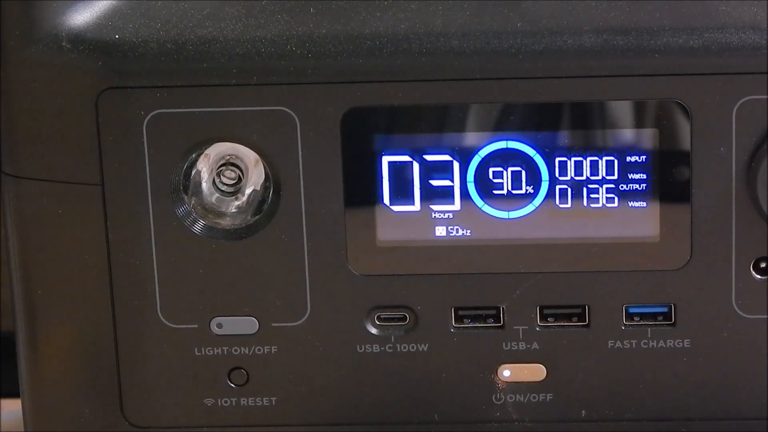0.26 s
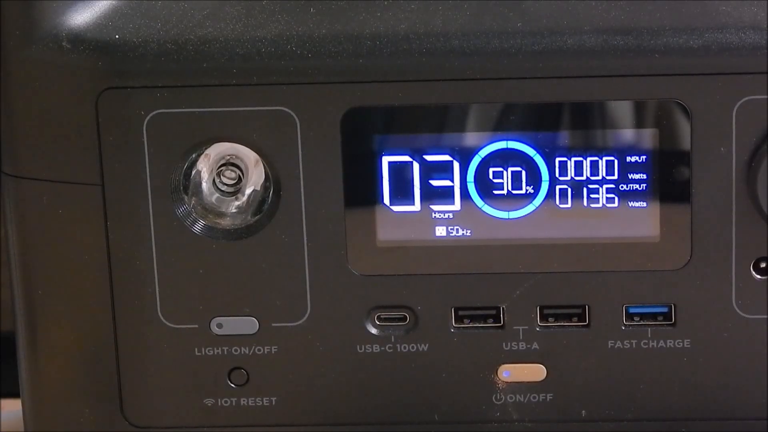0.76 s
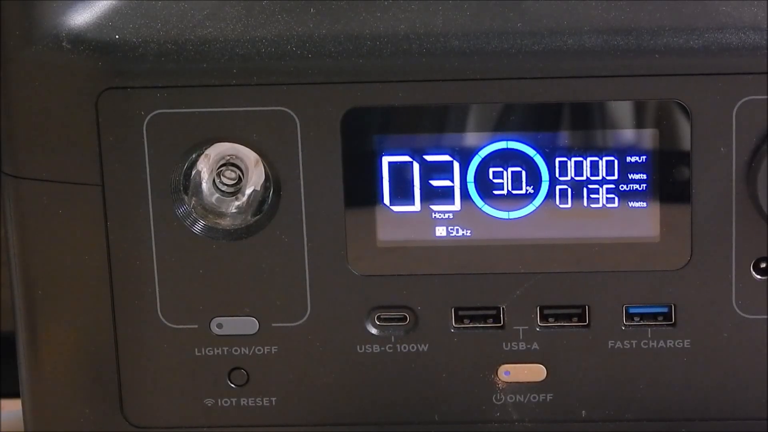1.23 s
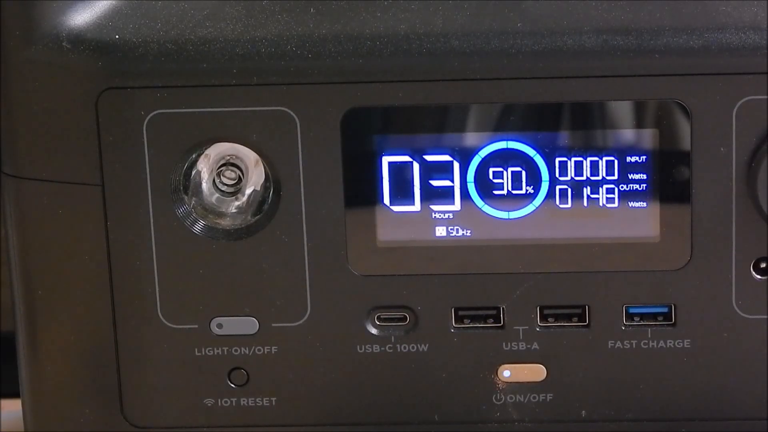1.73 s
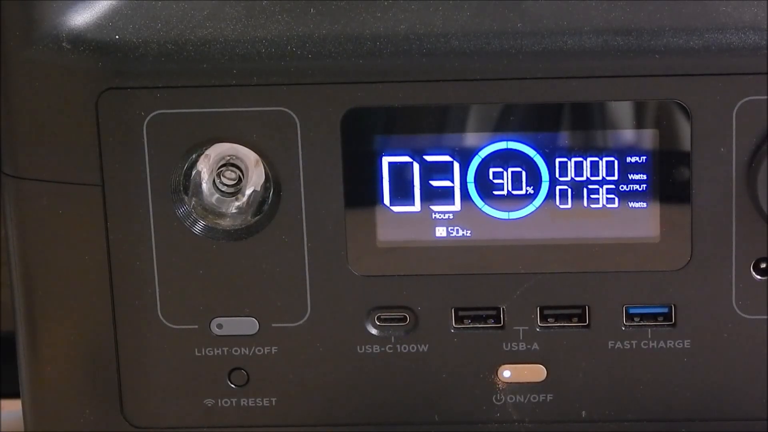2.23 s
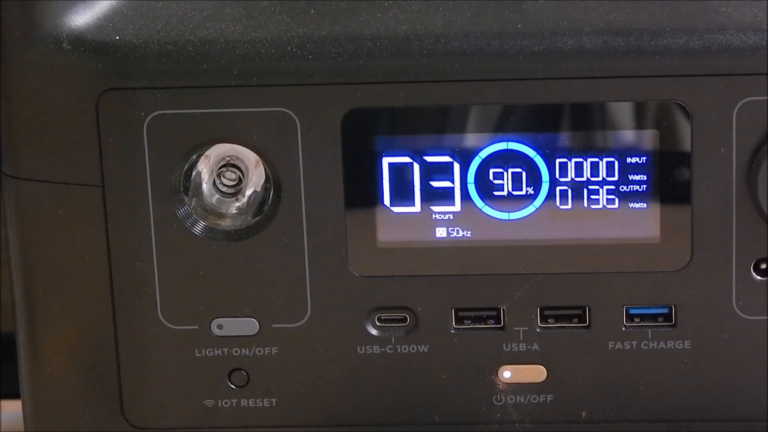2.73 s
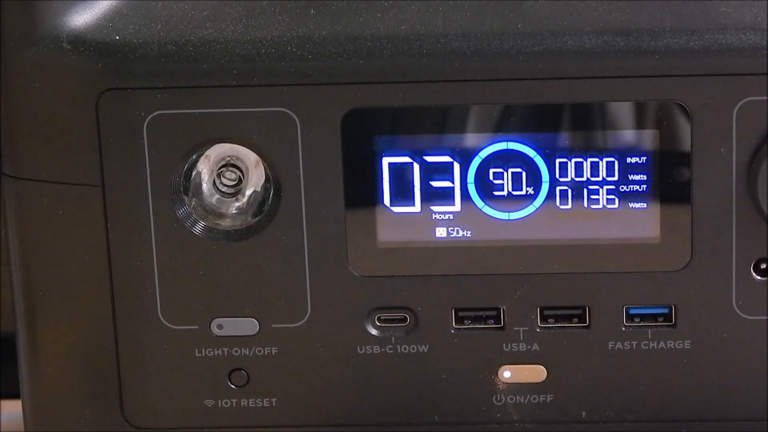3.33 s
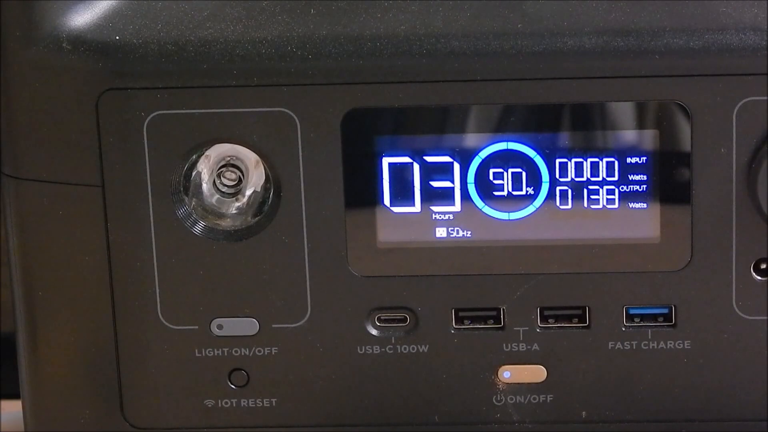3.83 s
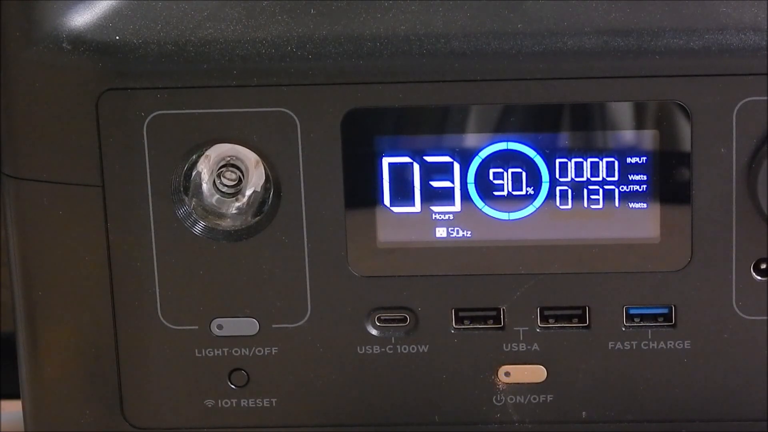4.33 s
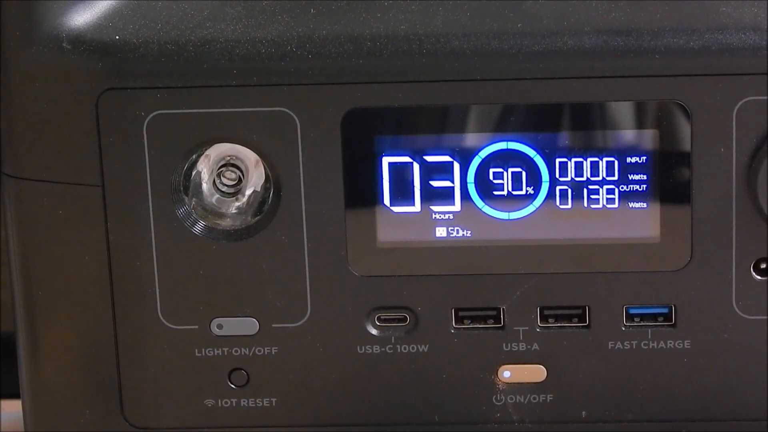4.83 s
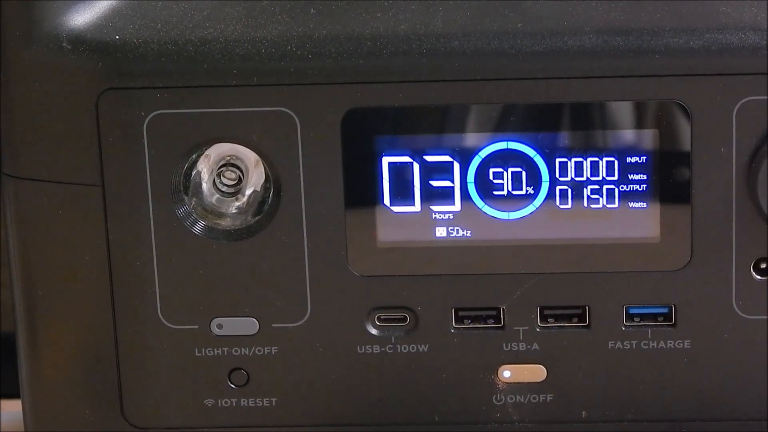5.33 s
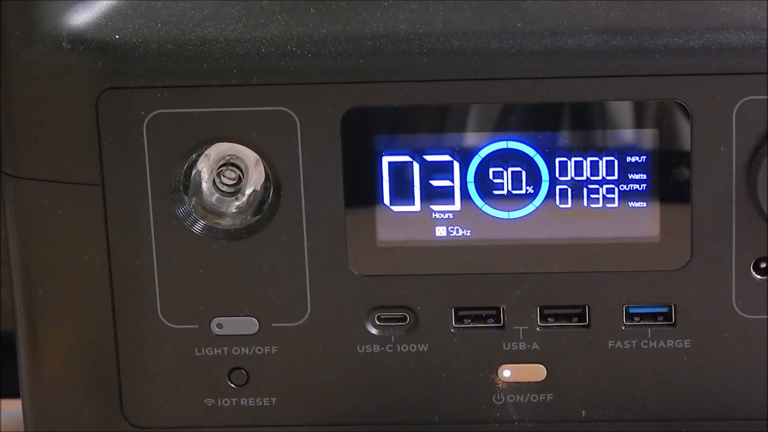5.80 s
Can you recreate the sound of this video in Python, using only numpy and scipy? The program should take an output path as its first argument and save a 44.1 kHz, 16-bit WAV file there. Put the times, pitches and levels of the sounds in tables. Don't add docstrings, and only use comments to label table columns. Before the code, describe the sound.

A fuel pump knocks sharply every 0.7 seconds over a soft blower rush, until a deep, swelling burner hum surges up near the end.

```python
import sys
import numpy as np
from scipy import signal
from scipy.io import wavfile
from scipy.ndimage import uniform_filter1d

SR = 44100
rng = np.random.default_rng(int(sys.argv[2]) if len(sys.argv) > 2 else 0)


def bounce(signal):
    frames = np.transpose(np.atleast_2d(signal))
    limited = np.clip(frames, -1, 1)
    pcm = np.round(limited * 32767).astype(np.int16)
    wavfile.write(sys.argv[1], SR, pcm)


def convert_level_to_amplitude(level_db):
    exponent = np.asarray(level_db, float) / 20
    return 10 ** exponent


N = 267378


def rms_one(x):
    return x / np.sqrt(np.mean(x ** 2) + 1e-20)


def at_hz(points, hz, column=1):
    points = np.array(points)
    return np.interp(np.log(hz), np.log(points[:, 0]), points[:, column])


def drift(rate_hz):
    r = np.exp(-80 * np.pi * rate_hz / SR)
    white = rng.standard_normal(N // 40 + 2002)
    slow = signal.lfilter([1], [1, -2 * r, r * r], white)[2000:]
    return np.interp(np.arange(N) / 40, np.arange(len(slow)), rms_one(slow))


def clicks(times, levels_db, size=N):
    out = np.zeros(size)
    np.add.at(out, (np.asarray(times) * SR).astype(int), convert_level_to_amplitude(np.asarray(levels_db)))
    return out


def ring(x, hz, t60):
    r = convert_level_to_amplitude(-60 / (t60 * SR))
    w = 2 * np.pi * hz / SR
    return signal.lfilter([0, np.sin(w)], [1, -2 * r * np.cos(w), r * r], x + 1e-18)


def resonance(hz, width_hz):
    x = rng.standard_normal(N)
    r = np.exp(-np.pi * width_hz / SR)
    w = 2 * np.pi * hz / SR
    for _ in range(2):
        x = signal.lfilter([1, 0, -1], [1, -2 * r * np.cos(w), r * r], x)
    return rms_one(x)


# f/Hz, left-right likeness (-1 to 1)
COHERENCE = [(100, 0.9316), (250, 0.97), (500, 0.77), (1000, 0.52), (2000, 0.011), (8000, 0.01),
             (12000, 0.047)]
# f/Hz, left minus right/dB
PORT_LEAN = [(500, -0.07), (2000, .2), (4000, 1.8), (8000, 2.5), (12000, 5.5)]


def stereo_noise(spectrum, shape, size=N):
    out, white = 0, rng.standard_normal((2, 2, size))
    bottom, top = spectrum[0][0], spectrum[-1][0]
    edges = np.geomspace(max(bottom, 20), top, round(3 * np.log2(top / bottom)))
    for k, (low, high) in enumerate(zip(edges, edges[1:])):
        band = signal.butter(2, [low, high], "band", fs=SR, output="sos")
        mid, side = signal.sosfilt(band, white[k % 2])
        hz = np.sqrt(low * high)
        alike = np.clip(at_hz(COHERENCE, hz), -1, 1)
        lean = at_hz(PORT_LEAN, hz) / 2
        pair = np.sqrt(1 + alike) * mid + np.sqrt(1 - alike) * side * [[1], [-1]]
        out = out + convert_level_to_amplitude(at_hz(spectrum, hz)) * convert_level_to_amplitude(np.array([[lean], [-lean]])) * shape(hz) * pair
    return out


# t/s, length/s, start f/Hz, end f/Hz, level/dB
BIRD_NOTES = [
    (2.33, .08, 3340, 3290, -72),
    (2.41, .12, 3250, 3300, -73),
    (2.52, .03, 3850, 3850, -75),
    (2.585, .04, 3600, 3650, -76),
    (3.28, .05, 7450, 7050, -72),
]


def birds():
    lean_db = -4
    out = np.zeros((2, N))
    hoarse = 1 + .5 * resonance(45, 60)
    for s, length, start_hz, end_hz, db in BIRD_NOTES:
        n = int(length * SR)
        warble = 40 * np.sin(2 * np.pi * 28 * np.arange(n) / SR)
        hz = np.linspace(start_hz, end_hz, n) + warble
        note = np.sqrt(np.hanning(n)) * np.sin(2 * np.pi * np.cumsum(hz) / SR)
        start = int(s * SR)
        out[:, start:start + n] += convert_level_to_amplitude(db) * note * convert_level_to_amplitude(np.array([[lean_db], [-lean_db]]) / 2)
    return out * hoarse


# f/Hz, density level/dB per Hz
AIR_SPECTRUM = [(25, -23), (50, -0.5), (100, -8.5), (170, -11.5), (280, -7.5), (450, -19.5), (700, -21),
                (1100, -25), (1600, -28.5), (2500, -34), (3500, -32.5), (5500, -38.5), (10500, -38.5),
                (12500, -35)]


def blower():
    flicker = convert_level_to_amplitude(.5 * drift(1.2) + .5 * drift(2.6))
    rush = rms_one(stereo_noise(AIR_SPECTRUM, lambda hz: flicker))
    return convert_level_to_amplitude(-49) * rush + convert_level_to_amplitude(-70) * resonance(1090, 96)


# t/s, peak level/dB, spring return relative to the stroke/dB
PUMP_STROKES = [
    (0.5157, -36.5, -6.5),
    (1.284, -37.5, -6),
    (1.9989, -37, -5.5),
    (2.7146, -38, -7),
    (3.4292, -38.5, -5),
    (4.1426, -37.5, -6.5),
    (4.8092, -36.5, -8),
    (5.4767, -37.5, -7),
]
# t after the first/s, level/dB
PLUNGER_CONTACTS = [
    (0, 4),
    (.0052, .5),
    (.0098, -2.5),
]
# f/Hz, level/dB, t60/s
PUMP_MODES = [(109.5, 6, 0.23), (252.4, 2.5, 0.071), (287.5, 10.5, .1), (386, 3, 0.013),
              (480, -10.5, 0.013), (690, -13, 0.049), (794, -9, 0.083), (1020, -5, 0.056), (1402, -9, 0.12),
              (1652, -3.5, 0.032), (1973, -8, 0.042), (2286, -2.5, 0.024), (2980, -19, 0.031),
              (3220, -13, 0.073), (3473, -12.5, 0.025), (3810, -11, 0.025), (4016, -12.5, 0.033),
              (4360, -23, 0.044)]
# f/Hz, density level/dB per Hz, t60/s
WALL_ECHO = [(117.5, -2.5, 0.24), (306, 1, 0.3), (660, -10, 0.32), (1000, -19, 0.35), (1860, -22, 0.41),
             (3100, -25.5, 0.27), (4200, -33, 0.43), (4800, -29.5, 0.075), (7930, -26.5, 0.14),
             (12100, -32, 0.19)]
RETURN_S, REBOUND_S = .045, .00416


def pump():
    size = SR // 2
    t = np.arange(size) / SR
    touch = clicks(*np.transpose(PLUNGER_CONTACTS), size=size)
    body = 0
    for k, (hz, db, t60) in enumerate(PUMP_MODES):
        body = body + convert_level_to_amplitude(db - 7.5) * (-1) ** k * ring(touch, hz, t60)

    def decay(hz):
        return convert_level_to_amplitude(-60 * t / at_hz(WALL_ECHO, hz, column=2)) * (1 - np.exp(-t / 0.0015))

    echo = stereo_noise(WALL_ECHO, decay, size=size)
    later = np.r_[np.zeros(4), body[:-4]]
    knock = np.array([body, later]) + convert_level_to_amplitude(16) * echo
    s, db, below = np.transpose(PUMP_STROKES)
    landing = clicks(s + RETURN_S, db + below)
    rebound = clicks(s + RETURN_S + REBOUND_S, db + below - 5)
    soft = np.exp(-2 * np.pi * 7000 / SR)
    back = signal.lfilter([1 - soft], [1, -soft], landing + rebound)
    return signal.fftconvolve(knock, [clicks(s, db) + back], axes=1)[:, :N]


# t of the top/s, top level/dB, time to grow the last 10 dB/s,
# time to lose 10 dB/s, f at the top/Hz
FLAME_SURGES = [
    (4.545, -37, -0.02, -0.1, 74.97),
    (4.69, -35, -0.02, 0.07, 72.1),
    (4.8, -21.5, 0.1, 0.18, 74.44),
    (5.068, -20, 0.1271, 0.036, 74.33),
    (5.181, -19, 0.0776, 0.0347, 78.16),
    (5.26, -22.5, 0.1032, 0.1457, 79.5),
    (5.52, -41, 0.08, 0.03, 72),
    (5.69, -33.5, .065, -0.07, 71.04),
    (5.774, -32, .045, 0.1, 70.04),
    (5.905, -22, 0.08, 0.2, 74.94),
]
SURGE_SMOOTHING_S = .02
SAG_HZ_PER_DB, SAG_LIMIT_DB = 0.7, 18
FULL_DB = -20


def surges():
    t = np.arange(N) / SR
    s, top_db, grow, die, hz = np.transpose(FLAME_SURGES)[:, :, None]
    pace = np.maximum(np.where(t < s, grow, die), SURGE_SMOOTHING_S)
    lost_db = np.minimum(10 * ((t - s) / pace) ** 2, 90)
    power = uniform_filter1d(convert_level_to_amplitude(2 * (top_db - lost_db)), size=int(SURGE_SMOOTHING_S * SR), axis=1)
    total = power.sum(axis=0)
    sagged_hz = hz - SAG_HZ_PER_DB * np.minimum(lost_db, SAG_LIMIT_DB)
    return 10 * np.log10(total), np.sum(power * sagged_hz, axis=0) / total


# start t/s, length/s, level/dB
CHAMBER_FLARES = [(.15, .15, -70), (0.706, 0.227, -45), (0.975, 0.052, -46.5), (1.083, .06, -38.5),
                  (1.224, .13, -48.5), (1.598, 0.11, -54), (1.89, 0.0554, -45.5), (2.148, 0.11, -56),
                  (3.022, 0.19, -55), (3.295, 0.119, -54), (3.7, 0.1, -47.5), (3.848, 0.265, -50),
                  (4.27, .07, -41.5), (4.374, 0.1, -43)]
# t/s, peak level/dB
FUEL_PUFFS = [
    (1.698, -53),
    (4.86, -58),
    (5.062, -44.5),
    (5.163, -46.5),
    (5.197, -55.5),
    (5.332, -54.5),
    (5.88, -50),
]
# f/Hz, density level/dB per Hz
ROAR_SPECTRUM = [(90, 3), (150, 0), (200, -9), (280, 0.5), (400, -11.5), (600, -14), (1100, -26.5),
                 (1700, -32.5), (2400, -41)]
CHAMBER_HZ, CHAMBER_WIDTH_HZ = 64, 28.5
FLARE_EDGE_S, MUTTER_IDLE_DB = 0.027, -61
ROAR_IDLE_DB, ROAR_FULL_DB, ROAR_GROWTH, ROAR_LAG_S = -55, -45, 0.61, 0.14


def burner():
    t = np.arange(N) / SR
    mutter = resonance(CHAMBER_HZ, CHAMBER_WIDTH_HZ)
    mutter = mutter / (uniform_filter1d(mutter ** 2, size=3000) + 0.35) ** .35
    flare = 0
    for s, length, db in CHAMBER_FLARES:
        inside = np.minimum(t - s, s + length - t)
        flare = flare + convert_level_to_amplitude(db) * np.clip(inside / FLARE_EDGE_S + .5, 0, 1)
    puff = 0
    for s, db in FUEL_PUFFS:
        puff = puff + convert_level_to_amplitude(db) * np.maximum(t - s, 0) / 0.0096 * np.exp(1 - np.abs(t - s) / 0.02032)
    swell = convert_level_to_amplitude(ROAR_FULL_DB + ROAR_GROWTH * (surges()[0] - FULL_DB))
    swell = uniform_filter1d(swell, size=int(ROAR_LAG_S * SR))
    flicker = convert_level_to_amplitude(1.2 * drift(9))
    roar = rms_one(stereo_noise(ROAR_SPECTRUM, lambda hz: flicker))
    return (convert_level_to_amplitude(MUTTER_IDLE_DB) + flare) * mutter + (convert_level_to_amplitude(ROAR_IDLE_DB) + swell + puff) * roar


def rattle():
    band = signal.butter(2, [8800, 11500], "band", fs=SR, output="sos")
    buzz = signal.sosfilt(band, rng.standard_normal((2, N)))
    drive = np.clip((surges()[0] + 22) / 2, 0, 1)
    return convert_level_to_amplitude(-51) * drive * buzz * convert_level_to_amplitude(np.array([[0], [-8]]))


SECOND_DB, SECOND_GROWTH = -54.5, .45
THIRD_DB, THIRD_GROWTH = -38, 1
THIRD_MODE_HZ, THIRD_WIDTH_HZ = 236.6, 5


def hum():
    level_db, hz = surges()
    over_db = level_db - FULL_DB
    off_mode_db = 10 * np.log10(1 + ((3 * hz - THIRD_MODE_HZ) / THIRD_WIDTH_HZ) ** 2)
    second_db = SECOND_DB + SECOND_GROWTH * over_db
    third_db = THIRD_DB + THIRD_GROWTH * over_db - off_mode_db
    phase = 2 * np.pi * np.cumsum(hz + 1.5 * drift(25)) / SR + np.array([[.07], [-.07]])
    partials = 0
    for k, db in enumerate([level_db, second_db, third_db]):
        partials = partials + convert_level_to_amplitude(db) * np.sin((k + 1) * phase + k)
    return np.sqrt(2) * partials


def scene():
    return pump() + burner() + hum() + rattle() + blower() + birds()


# level of the moment/dB, weakest band still kept/dB per Hz
MASKING_FLOOR = [(-38, -122), (-29, -100), (-18, -94.5)]
MASK_SPREAD_DB = 2.2
TOP_HZ = 12030


def drop_masked(x, grain=0.27):
    window = np.sin(np.pi * (np.arange(2048) + .5) / 2048)
    hz, _, z = signal.stft(x, SR, window, 2048, 1024, scaling="psd")
    power = 2 * np.abs(z) ** 2
    loud_db = 10 * np.log10(power.sum(axis=1, keepdims=True) * hz[1] + 1e-18)
    floor_db = np.interp(loud_db, *np.transpose(MASKING_FLOOR))
    floor_db = floor_db + MASK_SPREAD_DB * rng.standard_normal(loud_db.shape[-1])
    error = rng.standard_normal(z.shape) + 1j * rng.standard_normal(z.shape)
    edges = np.unique(np.geomspace(40, 1025, 50).astype(int))
    for low, high in zip(edges, edges[1:]):
        band = power[:, low:high].mean(axis=1, keepdims=True)
        mask_db = floor_db - 2.5 * (hz[low] > 8800) + MASK_SPREAD_DB * rng.standard_normal(band.shape)
        z[:, low:high] += grain * np.sqrt(band / 4) * error[:, low:high]
        z[:, low:high] *= band > convert_level_to_amplitude(2 * mask_db)
    z[:, hz > TOP_HZ] = 0
    return signal.istft(z, SR, window, 2048, 1024, scaling="psd")[1][:, :N]


def roll_off(x):
    return signal.sosfilt(signal.butter(12, 12320, fs=SR, output="sos"), x)


def record(dry):
    rolloff = signal.butter(2, 22, "high", fs=SR, output="sos")
    finished = drop_masked(signal.sosfilt(rolloff, dry))
    return roll_off(finished)


dry = scene()
out = record(dry)
bounce(out)
```